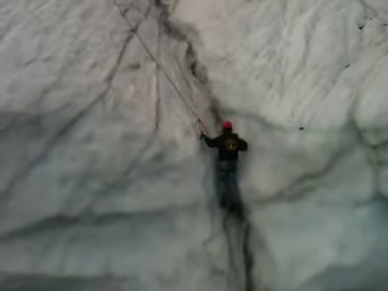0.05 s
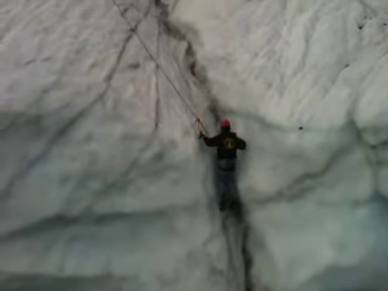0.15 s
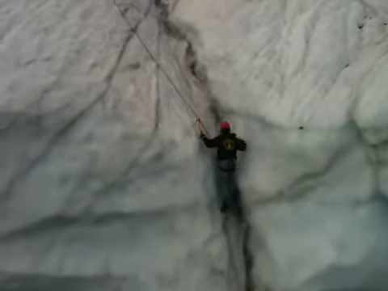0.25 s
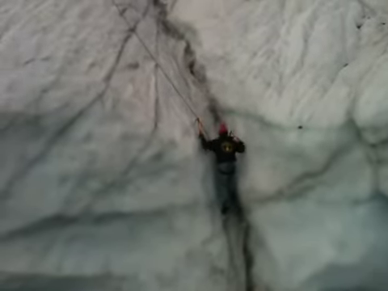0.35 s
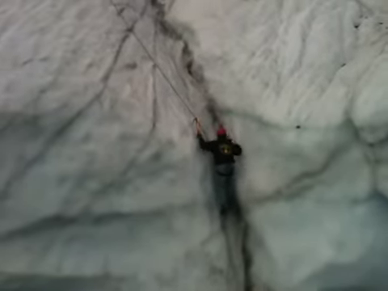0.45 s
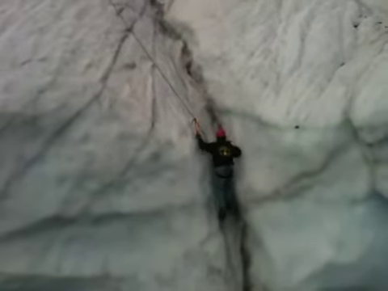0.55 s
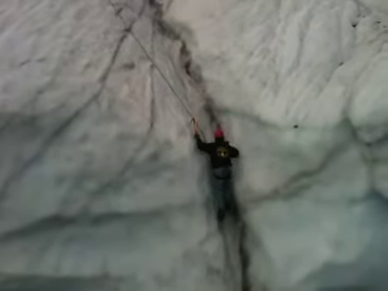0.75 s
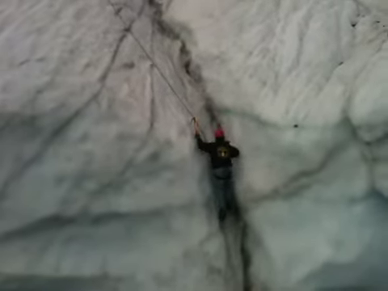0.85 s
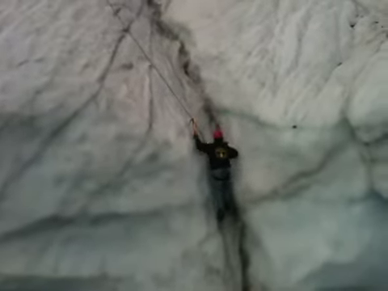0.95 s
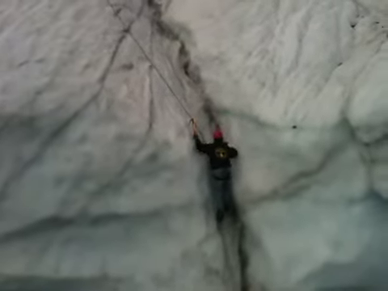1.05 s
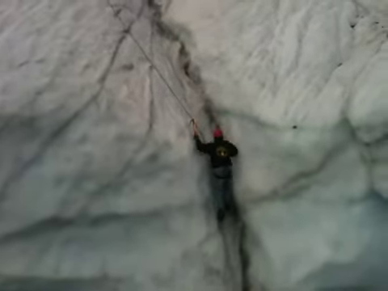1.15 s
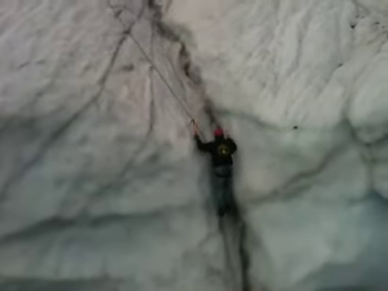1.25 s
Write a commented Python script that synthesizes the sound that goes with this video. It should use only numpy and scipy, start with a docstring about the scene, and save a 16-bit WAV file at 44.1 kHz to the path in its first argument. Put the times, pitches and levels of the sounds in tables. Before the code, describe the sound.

Three short, crunchy blows of climbing tools bite into ice outdoors, the last one deep and thudding. Loose pieces slide and knock down the wall, leaving a fine trickle of chips over faint wind rumble and hiss.

```python
"""Outdoors at an ice wall, a climber strikes three times. Each blow is a short crunch of tiny
fractures that rings the hollow ice; the third bites deep and thuds. Broken ice slides off and
knocks on the wall, leaving a trickle of ticking chips over faint wind and background hiss."""
import sys
import numpy as np
from scipy import signal
from scipy.io import wavfile

SR = 44100
rng = np.random.default_rng(int(sys.argv[2]) if len(sys.argv) > 2 else 0)


def transcribe(u):
    """Save the signal u as a 16-bit wav file named by the first command-line argument.

    u: samples, shape (n,) or (channels, n), limited to [-1, 1]; the rate is SR.
    q: integer samples, one column per channel.
    """
    v = np.clip(np.atleast_2d(u).T, -1, 1)
    q = np.round(v * 32767).astype(np.int16)
    wavfile.write(sys.argv[1], SR, q)


N = 57330  # 1.3 s

# One crunch a row: t/s, rise/s, hold/s, time to fade 60 dB/s, hollow level/dB, crisp level/dB,
# treble tilt/(dB per octave), low tone f/Hz, its level/dB, high tone f/Hz, its level/dB
CRUNCHES = [ (0.2, 0.00093, 0.0028, 0.017, -37, -40.5, -5, 844, -42, 1920, -45),
            (0.2036, 0.003, 0.021, 0.11, -32, -38, -14, 791, -45.5, 1200, -41.5),
            (0.239, 0.0022, 0.0031, 0.058, -35, -45.5, -7, 1180, -49, 2020, -40.5),
            (0.3383, 0.01, 0.0023, 0.14, -33, -39.5, -10, 834, -47, 1406, -43.5),
            (0.351, 0.0054, 0.0027, 0.11, -35.5, -36, -16, 743, -41.5, 1203, -37),
            (0.363, 0.0016, 0.0051, 0.041, -47.5, -56, -10, 627, -42.5, 2077, -38.5),
            (0.4166, 0.0061, 0.01, 0.05, -26, -27.5, -8, 537, -46.5, 1762, -36.5),
            (0.538, 0.0085, 0.008, 0.038, -33.5, -34, -20, 815, -41, 1590, -39),
            (0.5832, 0.0017, 0.0039, .03, -53, -39, -25, 1430, -62, 2090, -44),
            (0.635, 0.0051, 0.0035, 0.13, -41, -43, -38, 1075, -46, 1454, -52),
            (0.702, 0.006, 0.0015, 0.064, -67, -46.5, -33, 1480, -68, 2190, -50.5)]

def crunches():
    """Tools and big loose pieces hit the ice. It cracks, and each struck spot rings at two pitches."""
    out = np.zeros(N)
    hollow_length = 0.85  # the ring holds and fades in this share of the crackle's time
    for start, rise, hold, fade, hollow_db, crisp_db, tilt, low_hz, low_db, high_hz, high_db in CRUNCHES:
        crisp = burst(start, rise, hold, fade)
        hollow = burst(start, rise, hold * hollow_length, fade * hollow_length)
        spot = amp(low_db) * tone(start, low_hz) + amp(high_db) * tone(start, high_hz)
        out += fractures(amp(hollow_db) * hollow, amp(crisp_db) * crisp, tilt) + hollow * spot
    return out


# Pitches at which the hollow ice rings: f/Hz, width/Hz, relative level/dB
ICE_RINGS = [(182, 67, -1), (359.4, 16, 4), (535.7, 36, 4.5), (772, 88, 3.5), (1130, 130, -5),
             (1277, 118, 3.5), (1505, 236, -0.5), (1793, 160, 1), (2020, 160, 3), (2310, 135, -0.5)]
# How strong the cracks are from bass to treble: f/Hz, relative level/dB
CRACK_COLOUR = [(60, -48), (300, -8.5), (1500, -1), (2700, -8), (3400, -11), (4500, -0.5), (5500, 4),
                (6800, 5.5), (8200, -1), (9800, 9), (11800, -0.5), (16000, 3)]
CRACKS_PER_S, CRACK_SPREAD_DB = 7000, 3.5

def fractures(hollow_gain, crisp_gain, tilt_db):
    """Tiny cracks sound hollow through the ice and crisp through the air; tilt dulls the top treble."""
    hollow = ring(clicks(CRACKS_PER_S, CRACK_SPREAD_DB), ICE_RINGS)
    hollow = signal.lfilter(*signal.butter(2, [125, 2570], "bandpass", fs=SR), hollow)
    tilted = [(hz, db + tilt_db * np.log2(max(hz / 5000, 1))) for hz, db in CRACK_COLOUR]
    crisp = colour(clicks(CRACKS_PER_S, CRACK_SPREAD_DB), tilted)
    return hollow_gain * hollow + crisp_gain * crisp


# Dull thuds of the wall: t/s, level/dB, f/Hz
THUDS = [(0.072, -41.5, 164), (0.141, -45, 116), (.203, -41.5, 177), (0.229, -45, 136), (0.353, -42.5, 196),
         (0.4206, -26.5, 148.7), (0.483, -43, 179), (.542, -38.5, 155), (1.238, -52.5, 167)]

def thuds():
    """A push makes the wall shake at two low pitches that quickly die away."""
    out = np.zeros(N)
    for start, db, hz in THUDS:
        phase = 2 * np.pi * hz * (np.arange(N) / SR - start)
        shake = np.sin(phase) + amp(-9) * np.sin(1.31 * phase)
        out += amp(db) * burst(start, rise=0.0064, hold=0.0078, fade=0.063) * shake
    return out


# How loud the sliding ice is: t/s, hollow level/dB, crisp level/dB
SLIDE = [(.415, -82, -85), (.44, -42, -43.5), (.47, -43.5, -43), (.485, -39.5, -43), (.508, -42, -38.5),
         (.525, -46.5, -44.5), (.54, -38, -39), (.57, -45, -46.5), (.605, -60.5, -66), (.67, -51, -56),
         (.745, -76, -70), (1.3, -69, -61)]

def slide():
    """Broken ice scrapes down the wall, crackling and ringing."""
    hollow, crisp = level(SLIDE, column=1), level(SLIDE, column=2)
    ring_hz, width_hz = 2095, 220
    scrape = ring(clicks(CRACKS_PER_S, CRACK_SPREAD_DB), [(ring_hz, width_hz, 0)])
    return fractures(hollow, crisp, tilt_db=-12) + amp(-3.5) * hollow * scrape


# Chips that snap off or land: t/s, level/dB, f/Hz, time to fade 60 dB/s
CHIPS = [(.024, -48.5, 4660, 0.013), (0.2092, -32, 5200, 0.033), (0.212, -34, 6000, 0.025),
         (0.2435, -35, 6130, 0.0093), (0.3561, -35.5, 5600, .016), (0.4187, -24, 4300, 0.029),
         (.4222, -32.5, 3630, 0.087), (0.544, -38, 5200, 0.013), (0.5815, -39.5, 5600, 0.017),
         (.5855, -49, 5940, 0.0073), (0.725, -49, 9600, 0.023), (0.771, -44, 6220, 0.011),
         (0.847, -48.5, 5940, 0.01), (0.8999, -41.5, 1810, .015), (.975, -42.5, 5850, 0.006),
         (1.0103, -42, 1820, 0.0095), (1.0617, -49, 5500, 0.018), (1.086, -57, 6160, 0.018),
         (1.1664, -45, 6200, 0.0091), (1.201, -50, 3100, .03), (1.239, -45.5, 1310, 0.015),
         (1.269, -45, 5500, 0.023)]

def chips():
    """Each chip gives a dry tick: gritty noise around a pitch set by its size, and a brief ring."""
    out = np.zeros(N)
    spread = 1.17  # the grit reaches this factor below and above the pitch
    for start, db, hz, fade in CHIPS:
        band = signal.butter(1, [hz / spread, hz * spread], "bandpass", fs=SR)
        grit = unit(signal.lfilter(*band, rng.standard_normal(N)))
        tick = unit(grit + amp(-14) * tone(start, hz))
        out += amp(db) * burst(start, rise=0.0004, hold=0.0005, fade=fade) * tick
    return out


# How loud the falling grains are: t/s, level/dB
TRICKLE = [(0, -65), (.33, -58), (.6, -51.5), (.75, -54.5), (.88, -53), (.95, -57), (1.055, -51),
           (1.135, -58), (1.21, -54), (1.3, -49.5)]
# Their strength from bass to treble: f/Hz, relative level/dB
TRICKLE_COLOUR = [(200, -11), (800, 10), (2200, 3.5), (3500, 1), (5700, 9.5), (8200, 0.5), (10000, 3.5),
                  (12000, -2), (16000, -1)]

def trickle():
    """Fine grains of ice keep falling in small clumps."""
    clump_s, clump_db = 0.005, 2
    clumps = unit(signal.lfilter([1], [1, -np.exp(-1 / (clump_s * SR))], rng.standard_normal(N)))
    grains = amp(clump_db * clumps) * clicks(per_s=12000, spread_db=1.5)
    return level(TRICKLE) * colour(grains, TRICKLE_COLOUR)


def echoes(sound):
    """The uneven ice throws back many short, weak echoes."""
    tail = clicks(per_s=2000, spread_db=0) * burst(start=0.0023, rise=0.0028, hold=0, fade=0.058)
    return amp(-42) * signal.fftconvolve(sound, tail / np.linalg.norm(tail))[:N]


# How loud the wind is: t/s, level/dB
WIND = [(0, -52.5), (.1, -56.5), (.35, -55), (.41, -61), (.56, -57.5), (.68, -59.5), (1.3, -80)]
# Its strength from bass to treble: f/Hz, relative level/dB
WIND_COLOUR = [(25, -28), (60, -27.5), (110, -9), (180, -5.5), (260, -11), (600, -21.5), (3000, -84)]

def wind():
    """A little wind rumbles on the microphone and dies down."""
    return level(WIND) * colour(rng.standard_normal(N), WIND_COLOUR)


# Strength of the hiss from bass to treble: f/Hz, relative level/dB
HISS_COLOUR = [(25, -31), (70, -24), (120, -10.5), (180, 1.5), (230, -9.5), (300, 1.5), (420, -0.5),
               (750, -2), (1000, -4.5), (2000, -4.5), (3300, -16.5), (6000, -17.5), (11000, -28.5),
               (16000, -57)]
# Hollow tones in the air: f/Hz, width/Hz, relative level/dB
AIR_TONES = [(184.7, 9.4, 1.5), (268.4, 15, -2), (768, 8.3, -1.5)]

def air():
    """A steady hiss and faint hollow tones lie behind everything."""
    hiss, hum = rng.standard_normal((2, N))
    return amp(-56) * colour(hiss, HISS_COLOUR) + amp(-64.5) * ring(hum, AIR_TONES)


def amp(db):
    """Turns decibels into a number to multiply by."""
    return 10 ** (np.asarray(db) / 20)


def unit(x):
    """Scales a sound to an average strength (rms) of 1."""
    return x / np.sqrt(np.mean(x ** 2) + 1e-20)


def level(points, column=1):
    """Joins the points of one dB column into a gain over time."""
    columns = np.transpose(points)
    return amp(np.interp(np.arange(N) / SR, columns[0], columns[column]))


def colour(x, points):
    """Shapes bass and treble along (f/Hz, level/dB) points, at strength 1."""
    hz, db = np.transpose(points)
    f = abs(np.fft.fftfreq(4096, 1 / SR))
    log_gain = np.log(amp(np.interp(np.log(f + 1), np.log(hz), db)))
    # This filter responds only after each click, never before it.
    taps = np.fft.ifft(np.exp(np.conj(signal.hilbert(log_gain)))).real
    return unit(signal.fftconvolve(x, taps[:len(taps) // 2])[:N])


def ring(x, pitches):
    """Makes a sound ring at the given pitches, at strength 1."""
    return unit(sum(amp(db) * signal.lfilter(*signal.iirpeak(hz, hz / width, SR), x)
                    for hz, width, db in pitches))


def clicks(per_s, spread_db):
    """Random clicks; more spread makes their sizes less equal."""
    size = amp(spread_db * np.minimum(rng.exponential(1, N), 3))
    return size * rng.choice([-1, 1], N) * (rng.random(N) < per_s / SR)


def burst(start, rise, hold, fade):
    """A gain that rises, holds, then drops 60 dB every `fade` seconds."""
    t = np.arange(N) / SR - start
    return np.clip(t / rise, 0, 1) * np.exp(-np.log(1000) * np.maximum(t - rise - hold, 0) / fade)


def tone(start, hz):
    """A pure tone of strength 1 that crosses zero at start."""
    return unit(np.sin(2 * np.pi * hz * (np.arange(N) / SR - start)))


def scene():
    """The ice, its echoes, the air and the wind reach one microphone."""
    ice = crunches() + thuds() + slide() + chips() + trickle()
    return (ice + echoes(ice) + air() + wind())[None]


def record(dry):
    """The level dips just before the hardest blow, peaks are rounded and the highest treble is cut."""
    dip_at_s, dip_width_s, dip_db = 0.4122, 0.0022, -22
    ceiling, top_hz = 0.22, 15850
    dip = amp(dip_db * np.exp(-((np.arange(N) / SR - dip_at_s) / dip_width_s) ** 2))
    rounded = ceiling * np.tanh(dry * dip / ceiling)
    low_pass = signal.firwin(401, top_hz, window=("kaiser", 9), fs=SR)
    return signal.oaconvolve(rounded, low_pass[None], "same")


dry = scene()
out = record(dry)
transcribe(out)
```